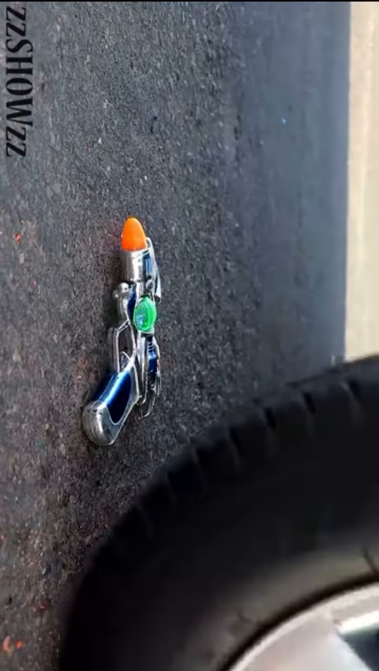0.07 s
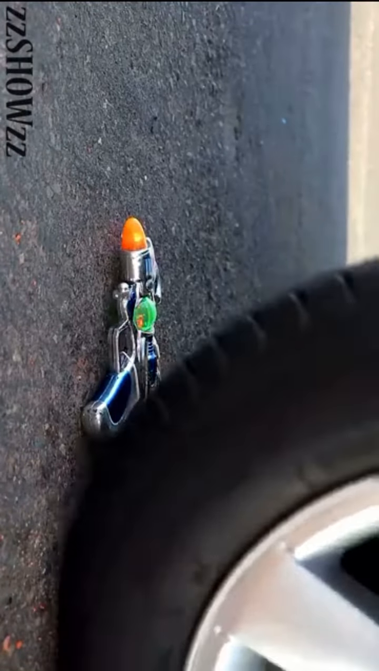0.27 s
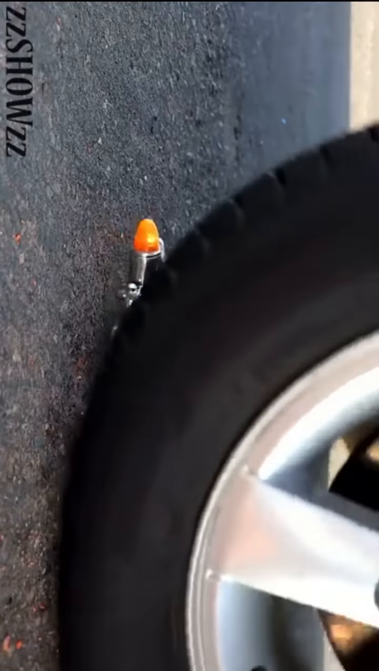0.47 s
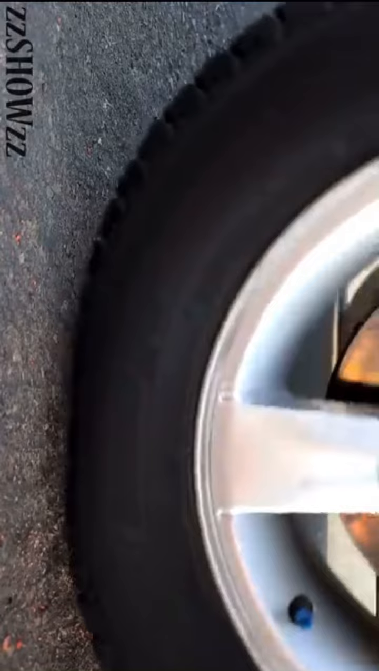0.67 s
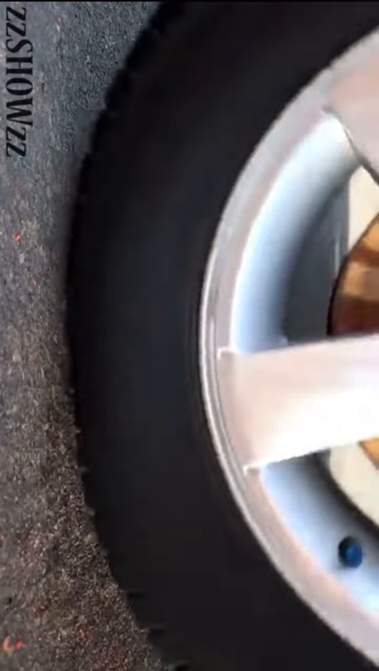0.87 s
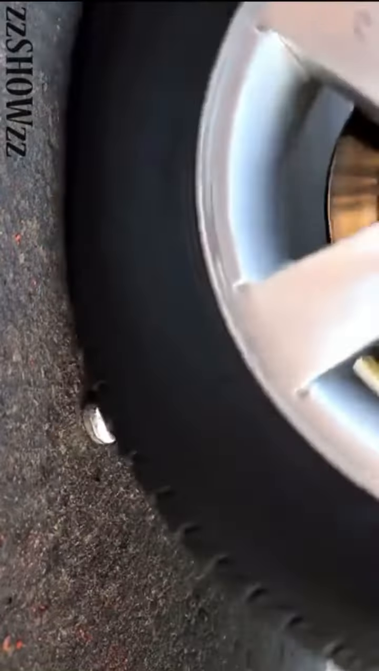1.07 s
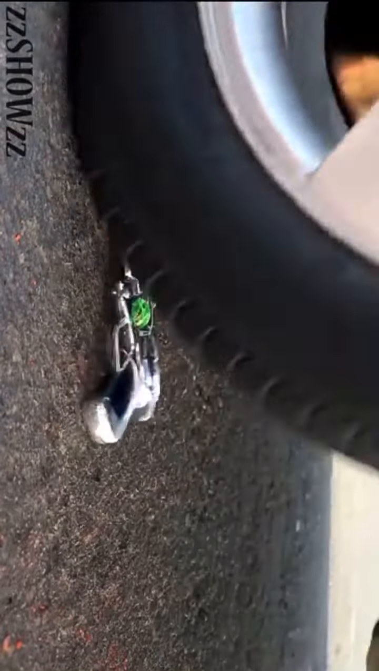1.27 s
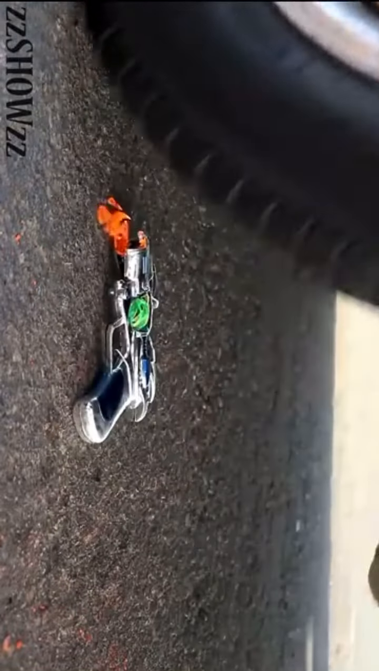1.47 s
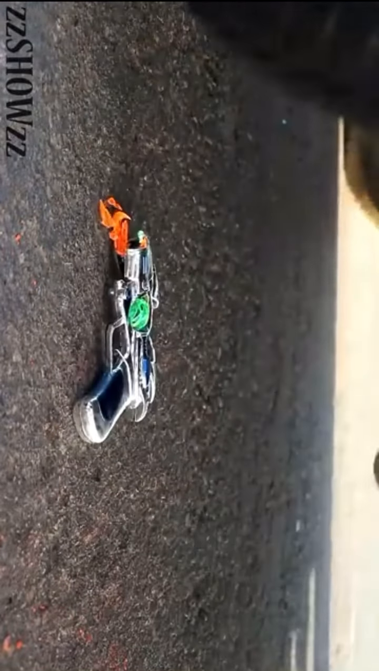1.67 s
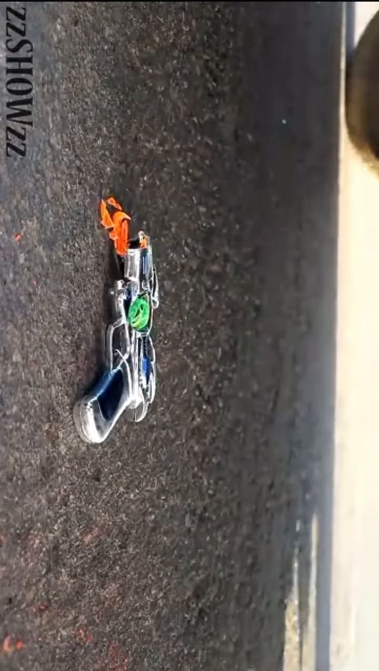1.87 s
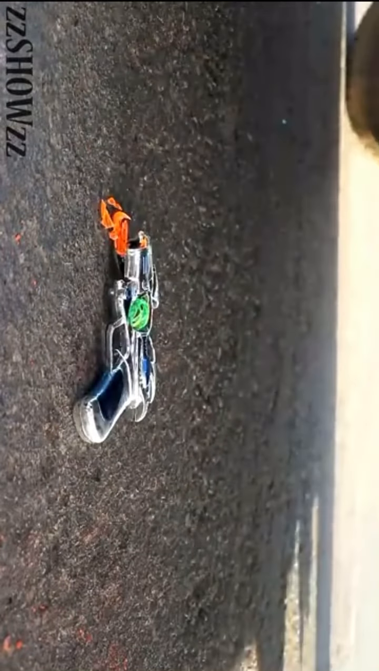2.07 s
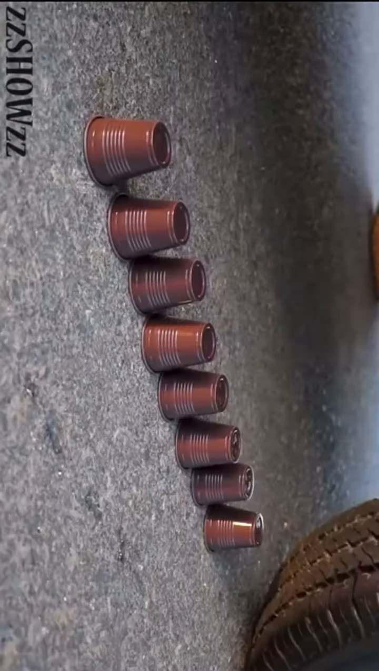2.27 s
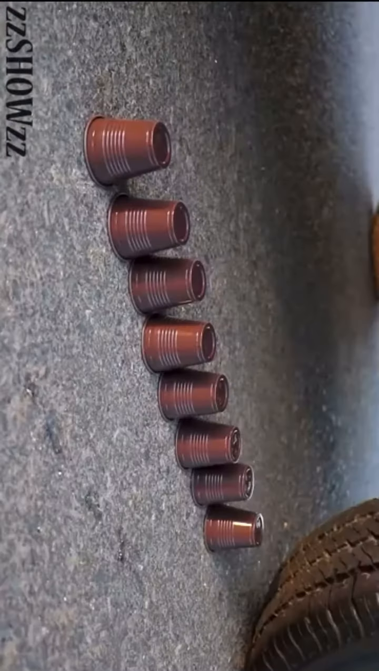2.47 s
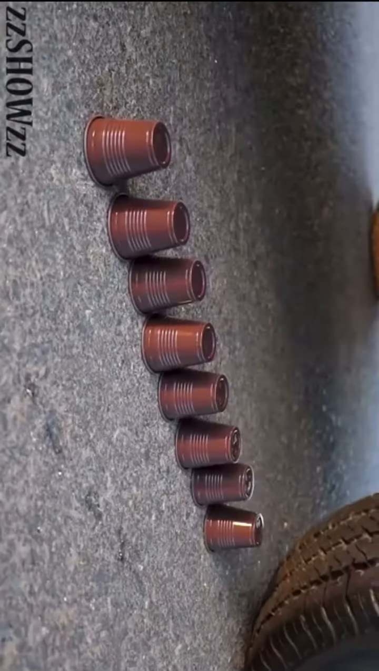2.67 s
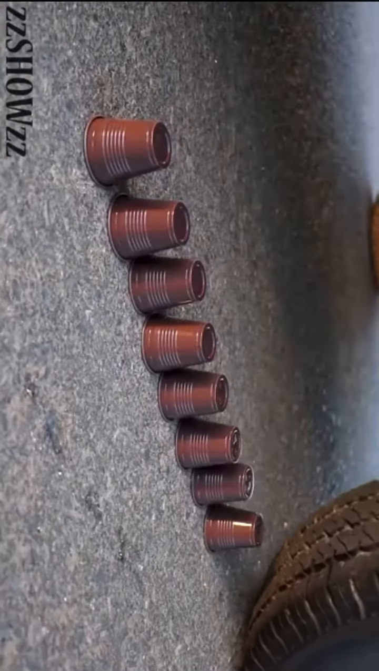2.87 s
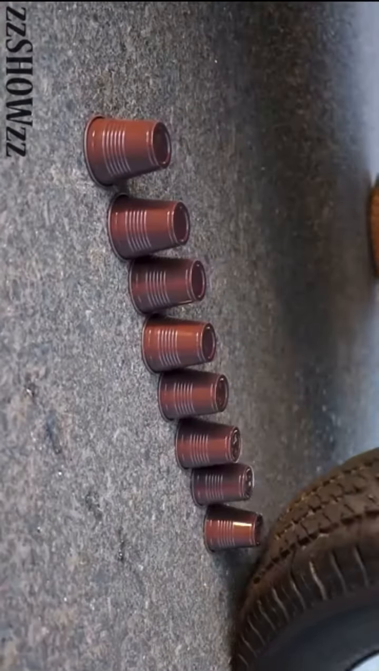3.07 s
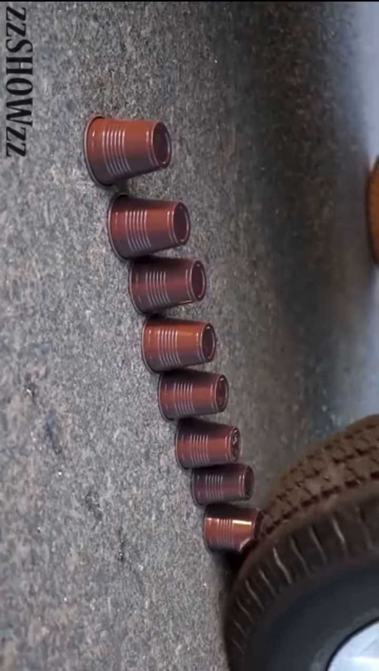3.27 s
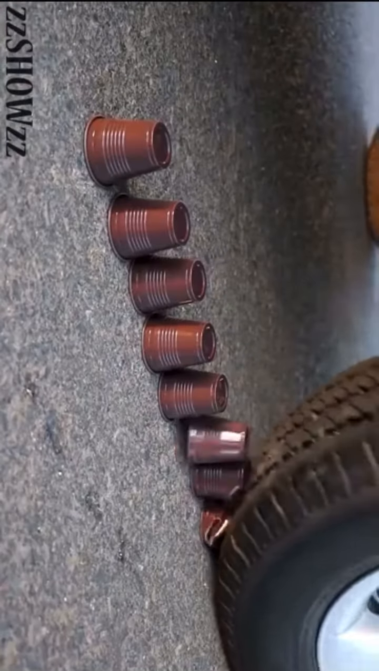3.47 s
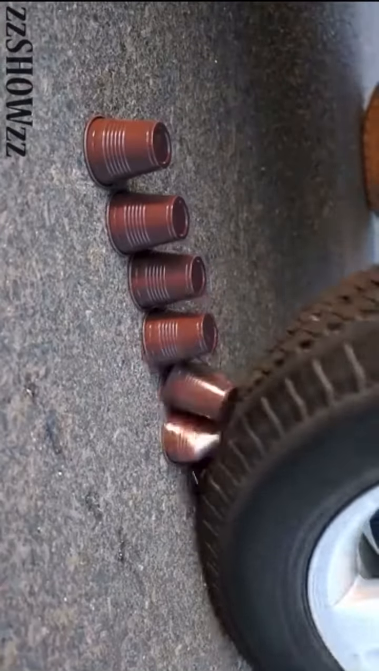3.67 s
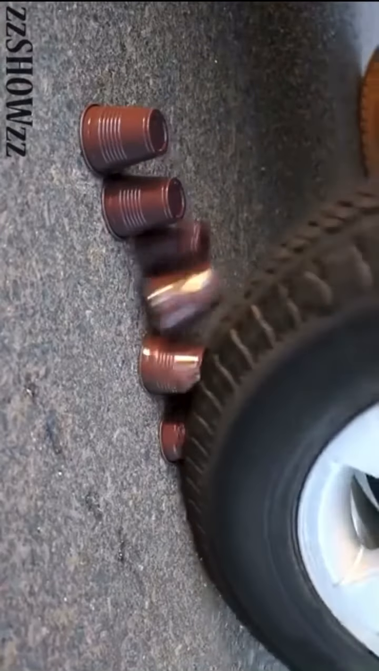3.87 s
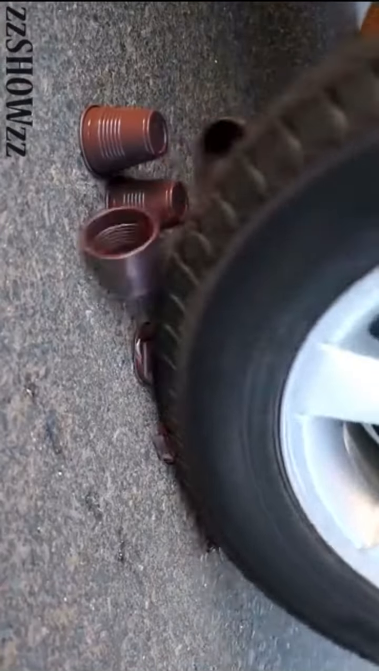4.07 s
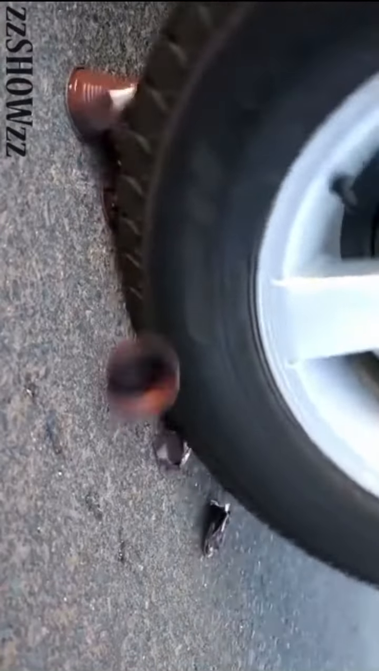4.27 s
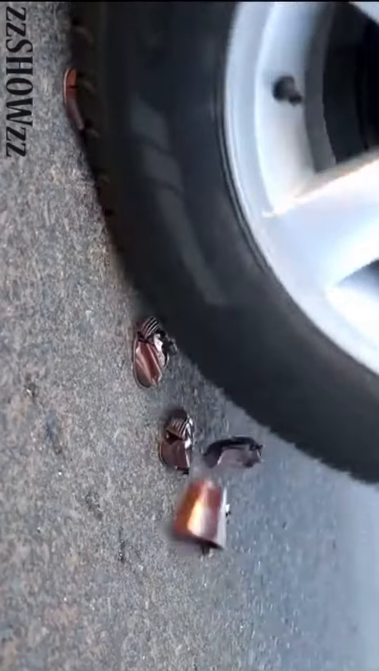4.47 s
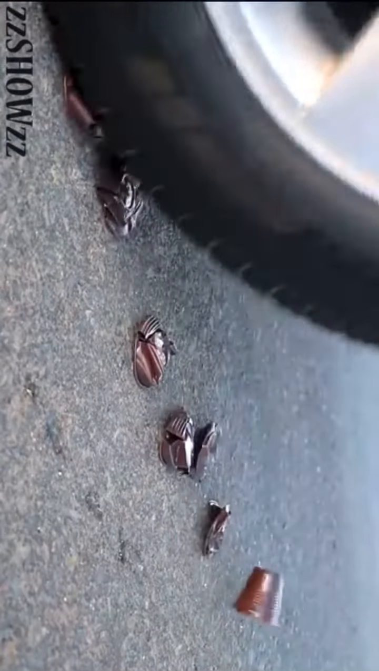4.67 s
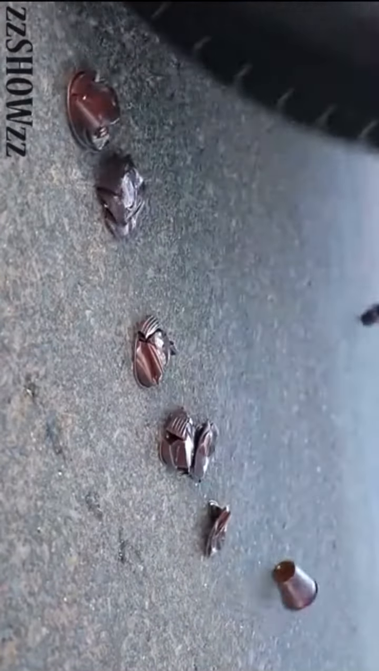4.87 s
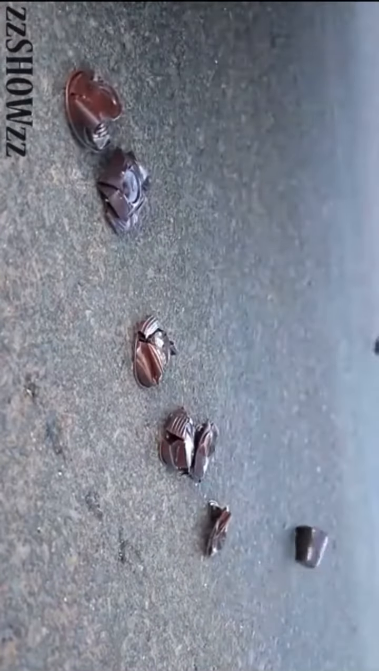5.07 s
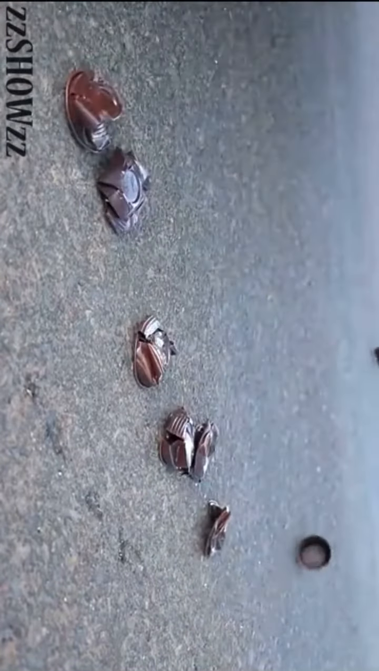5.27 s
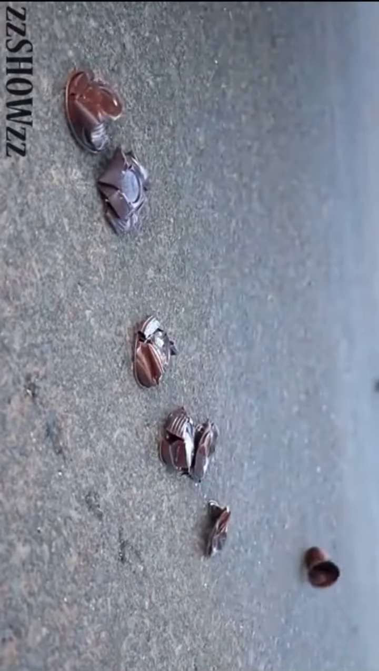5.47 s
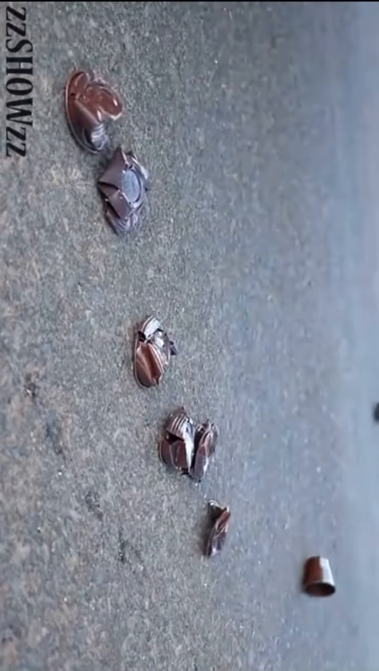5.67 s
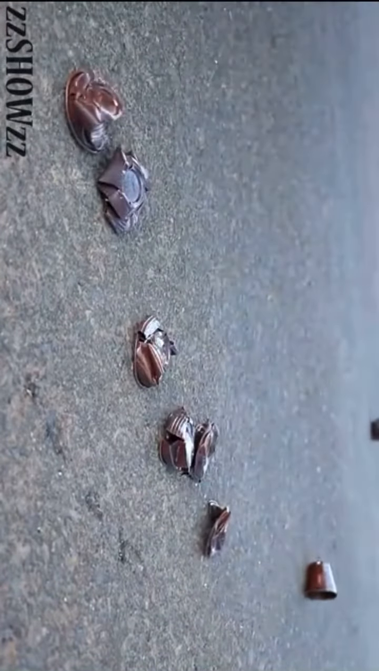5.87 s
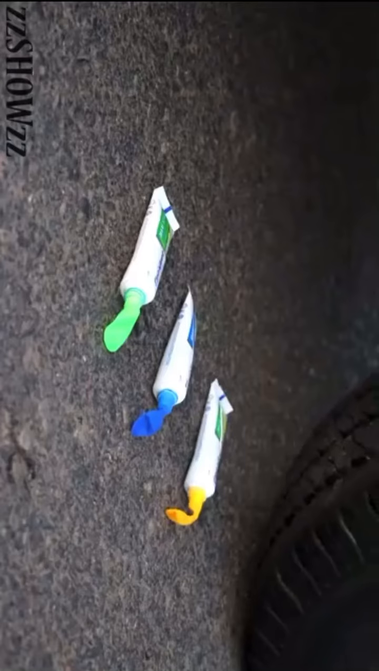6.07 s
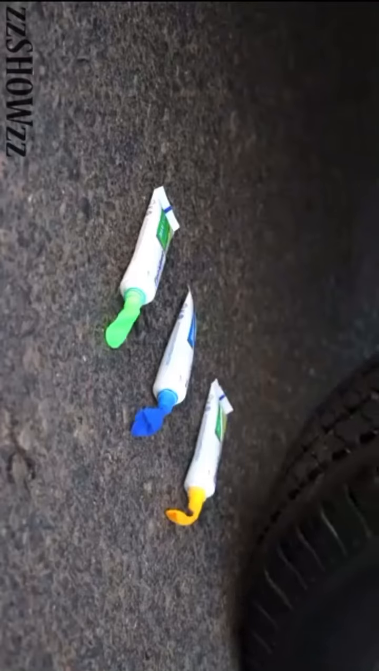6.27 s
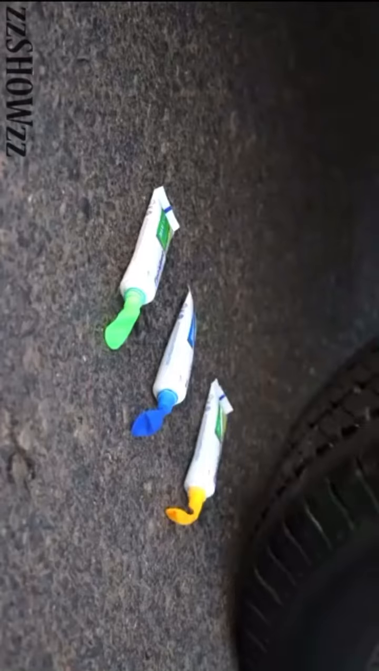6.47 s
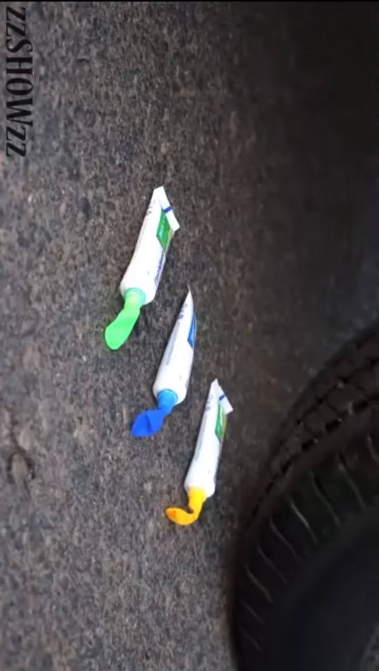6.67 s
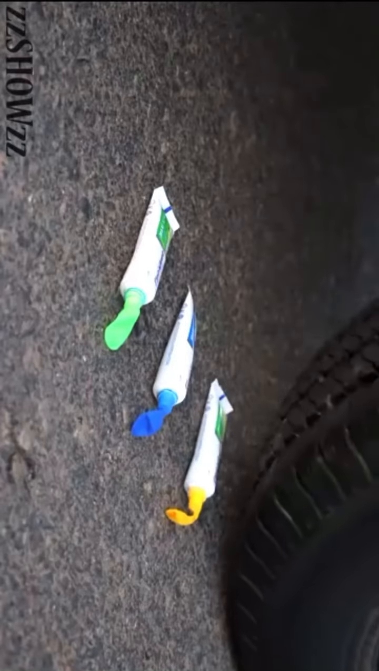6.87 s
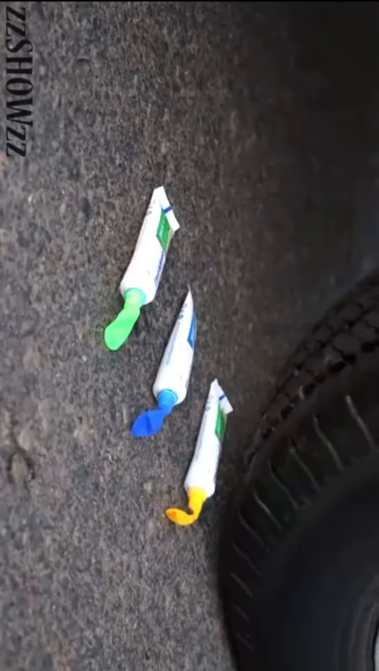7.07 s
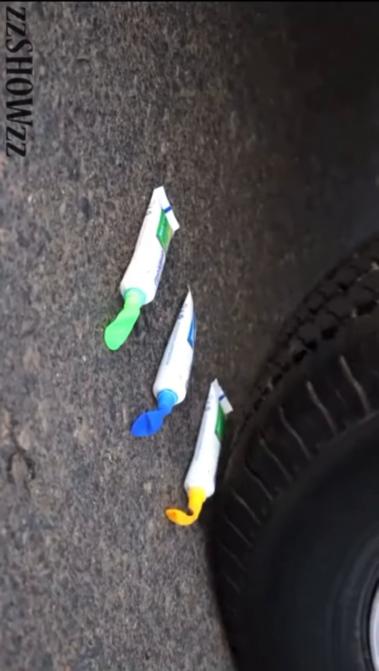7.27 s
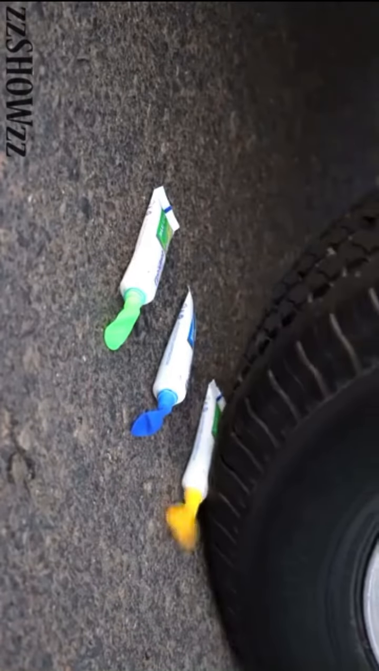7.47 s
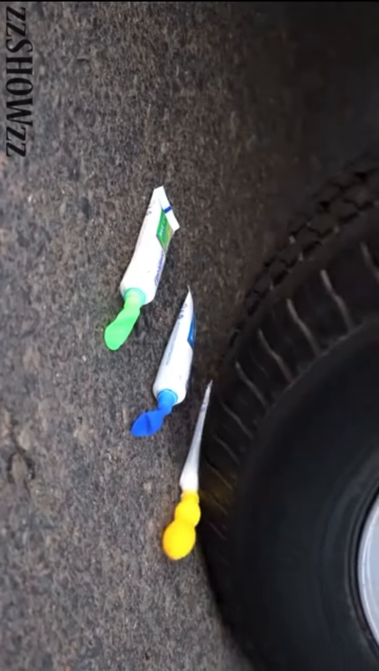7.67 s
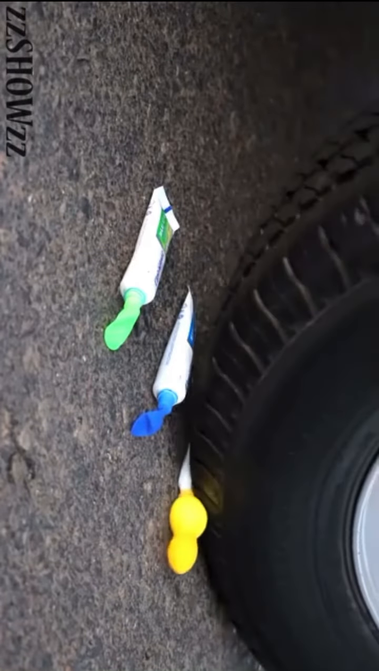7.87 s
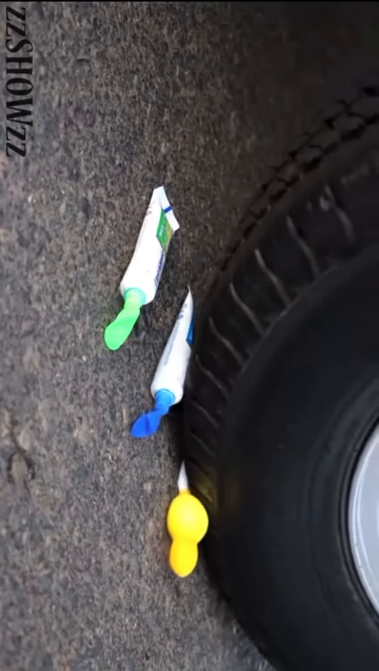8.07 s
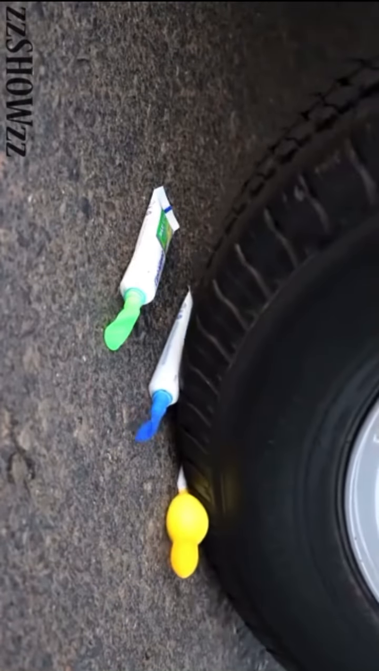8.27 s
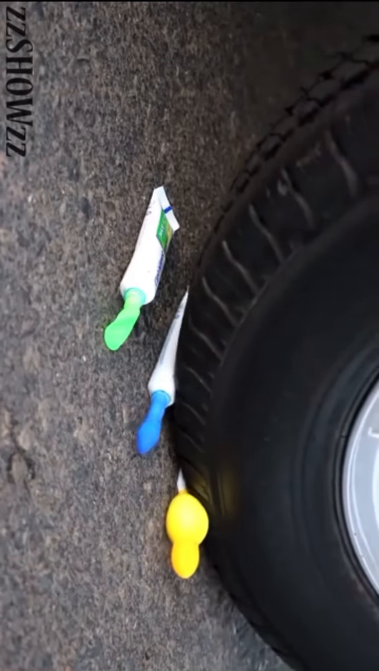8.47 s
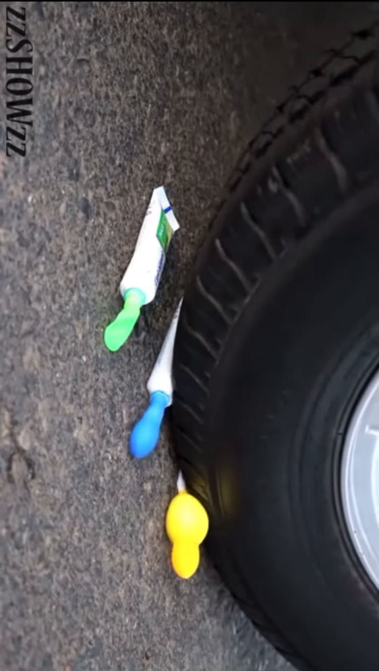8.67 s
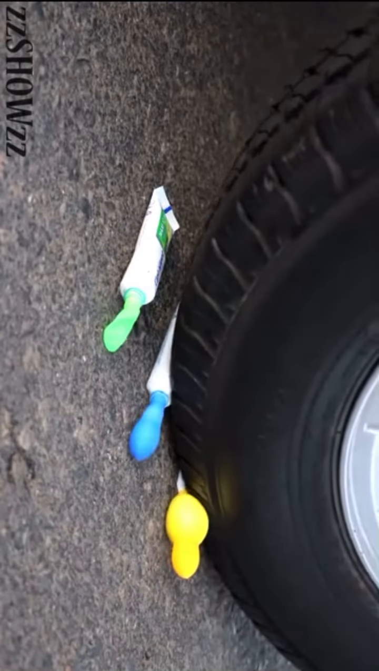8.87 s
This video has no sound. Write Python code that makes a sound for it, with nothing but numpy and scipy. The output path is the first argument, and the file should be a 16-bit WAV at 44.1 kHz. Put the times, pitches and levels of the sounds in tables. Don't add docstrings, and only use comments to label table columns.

```python
import sys
import numpy as np
from scipy import signal
from scipy.fft import rfft, irfft
from scipy.io import wavfile

SR = 44100
rng = np.random.default_rng(int(sys.argv[2]) if len(sys.argv) > 2 else 0)


def inscribe(sig):
    pcm = np.round(np.clip(np.atleast_2d(sig).T, -1, 1) * 32767)
    wavfile.write(sys.argv[1], SR, pcm.astype(np.int16))


def undo_db(level):
    steps = np.asarray(level, float) / 20
    return 10 ** steps


N = 392931

SCENE_CHANGES_S = [
    2.285,
    6.055,
]

# centre in seconds, peak level in dB, half length in seconds.
GUSTS = [
    (0, -66, .3),
    (1.93, -44.5, 0.097),
    (2.804, -54.5, 0.27),
    (3.993, -56.5, 0.46),
    (6.384, -46, 0.051),
    (6.702, -51, 0.062),
    (6.94, -59, .15),
]
BREEZE_DB = -77.5

# frequency in Hz, level in dB per Hz.
NEAR_SIDE = [(20, -9.5), (70, -13.5), (160, -14), (420, -12.5), (850, -16), (1300, -12.5), (1750, 1),
             (2300, -10), (3500, -18.5), (8600, -41), (11500, -44), (12300, -26.5), (14500, -34.5),
             (16000, -35)]
FAR_SIDE = [(20, -15.5), (127, -21), (300, -17), (600, -12), (1030, -11.5), (1290, -12.5), (1650, -15.5),
            (2000, -22), (2530, -10.5), (3500, -20.5), (5200, -22), (8000, -34), (16000, -52.5)]
CUP_YARD = [(20, 5.5), (77, 4), (310, -6), (620, -4.5), (1190, -8.5), (1660, -10), (1960, -10),
            (2750, -14.5), (5200, -22.5), (8000, -32.5), (16000, -54)]
TUBE_YARD = [(12, -44), (20, -21), (48, -0.5), (150, -5), (330, -2.5), (485, -7.5), (620, -2), (720, -10),
             (1480, -6.5), (1760, -13), (2260, -10.5), (2990, -17), (5230, -22.5), (8000, -33),
             (16000, -54)]
# time in seconds, engine level in dB, noise around the wheel note in dB,
# share of the far-side colour from 0 to 1.
ENGINE_MOVES = [(0, -33.5, -56, 0.1), (.3, -36, -36, 0.06), (.5, -34.5, -27, 0.44), (.9, -35, -51, 1),
                (1.0, -24, -13, 0.5), (1.1, -37.5, -34, 1), (1.5, -35, -21.5, 0.6), (2.09, -31.5, -33, 0.8),
                (2.29, -35, -49, 0.66)]
# time in seconds, level in dB.
YARD_LEVELS = [
    [(2.285, -45.5), (3.3, -46.5), (4.6, -48), (5.6, -50.5), (6.055, -52.5)],
    [(6.055, -45), (7.5, -46), (8.91, -46.5)],
]
# frequency in Hz, level in dB rms.
FAN = [(242.2, -51.5), (366.1, -50)]
# frequency in Hz, width in Hz, level in dB.
IDLE = [(334, 20, -65), (409, 20, -68), (603, 12, -58), (996, 25, -69), (1163, 25, -69), (1530, 30, -63),
        (2230, 25, -62), (3128, 60, -74), (3500, 80, -71), (5250, 300, -70)]
# frequency in Hz, level in dB rms.
IDLE_ORDERS = [(75, -55), (115, -58)]
# time in seconds, frequency in Hz, level in dB rms.
DRONE = [(6.06, 135, -60), (6.6, 145, -61), (6.95, 140, -56), (7.28, 152, -52), (7.55, 172, -56),
         (7.74, 168, -55), (7.9, 146, -52), (8.56, 158, -53), (8.91, 154, -53)]
DRONE_GAIN_DB = 0.5
# start in seconds, then rows of frequency in Hz, width in Hz, level in dB.
WHINE = (7.9, [(5300, 45, -69)])
# time in seconds, frequency in Hz, level in dB rms.
WHEEL_NOTE = [
    [(0.2, 602.8, -58), (0.316, 604.5, -43), (0.374, 603.9, -60), (0.47, 600.6, -30), (0.48, 601.1, -43),
     (0.49, 600.7, -31.5), (0.606, 597.9, -39), (0.614, 597.6, -48), (0.68, 597.6, -30.5)],
    [(1.09, 612.2, -34), (1.132, 601.1, -27.5), (1.196, 593.0, -45.5), (1.278, 599.6, -26),
     (1.412, 604.3, -42), (1.418, 601.4, -39), (2.106, 604.2, -45.5), (2.19, 587.5, -39),
     (2.285, 608.0, -49)],
]
WHEEL_HZ, WHEEL_WIDTH_HZ = 600, 30

# frequency in Hz, level in dB rms.
SQUEAK = [(3289, -38.5), (4893, -50)]
# frequency in Hz, width in Hz, level in dB.
PAD_HISS = [(13200, 1400, -56)]
SQUEAK_S = 2.112
# frequency in Hz, level in dB, 60 dB decay in seconds.
THUMP = (55, -8, .085)
THUMP_S = 0.719

# frequency in Hz, level in dB, 60 dB decay in seconds.
CUP_AIR = [(1267, -6, 0.082), (1287, -22, 0.03), (1120, -46, .04)]
# frequency in Hz, level in dB, 60 dB decay in seconds.
CUP_NOTES = [(1695, 0, .06), (1810, -4, .06), (2030, -5, .045), (2680, -18, .03), (3300, -11, .045),
             (3520, -5, .07), (3810, -11, .04), (4400, -6, .05), (4700, -1, .07), (4900, 0, .075),
             (5150, 0, .055), (5400, -3, .04), (6000, -3, .035), (6900, -7, .03), (7700, -7, .03),
             (8740, -9, .025)]
# start in seconds, air note peak in dB, low wall notes in dB, high wall notes in dB,
# strongest high note in Hz.
BOUNCES = [(4.1315, 5.5, -18, -7, 3270), (4.1954, -12, -23, -25, 5000), (4.3054, -12, -17, -11.5, 3120),
           (4.552, -33, -29, -11, 4040), (4.571, -17, -29, -15, 5160), (4.596, -1, -8.5, -16.5, 3760),
           (4.6363, -18, -28, -10, 5140), (4.7544, -8.5, -21, -18.5, 5250), (4.7905, -31, -29, -18.5, 5790),
           (4.806, -27, -31, -11.5, 4680), (4.824, -16, -12.5, -11.5, 5060),
           (4.8345, -24.5, -27, -28, 5220), (4.8582, -12.5, -21, -25, 5130), (4.8894, -38, -40, -28, 5100),
           (4.903, -27, -34, -24, 3700), (4.9217, -24, -21, -15.5, 4600), (4.9538, -23.5, -21, -16.5, 5150),
           (4.9688, -19.5, -36, -47, 3290), (4.9918, -31, -35, -16, 3030), (5.0105, -15.5, -24, -22, 5200),
           (5.0727, -10.5, -38, -21.5, 5060), (5.0802, -40, -12, -21.5, 3800),
           (5.1253, -26.5, -29, -29, 5000)]
# start in seconds, air note peak in dB, low wall notes in dB,
# high wall notes in dB, strongest high note in Hz.
ROLL = [(5.1866, -36, -38, -28.5, 5090), (5.2098, -20, -28, -36, 3550), (5.2334, -31, -39, -26, 4770),
        (5.2776, -27, -28, -30.5, 4740), (5.3005, -23.5, -41, -34, 4900), (5.3151, -13.5, -44, -27, 4860),
        (5.3606, -31, -50, -33.5, 4190), (5.3738, -21, -47, -28, 4700), (5.3963, -12, -43, -33.5, 4770),
        (5.4283, -37, -54, -36, 4750), (5.444, -21.5, -51, -31.5, 3460), (5.468, -31, -44, -48, 6000),
        (5.4935, -10.5, -34, -46, 4690), (5.5188, -25, -46, -34.5, 4350), (5.5518, -26, -46, -36, 4390),
        (5.572, -26, -54, -36, 4500), (5.6318, -22.5, -44, -30, 5000), (5.673, -27.5, -49, -28.5, 4380),
        (5.7039, -27, -52, -36, 3840), (5.7242, -32, -44, -55, 3840), (5.7437, -33, -50, -36.5, 4930),
        (5.772, -37, -55, -37.5, 4760), (5.818, -42, -55, -40.5, 4630), (5.8517, -49, -56, -44, 4740),
        (5.865, -44, -58, -43, 4750), (5.897, -39, -55, -34.5, 4630), (5.9284, -44, -55, -48, 4770),
        (5.9504, -42, -52, -46, 4850), (5.9833, -40.5, -47, -36.5, 4450), (6.0352, -46, -45, -52, 3130)]
AIR_LOW_HIGH_GAINS_DB, GRIT_DB = (1.5, 0, 7.5), -13.5
MAIN_NOTE_DB, MAIN_NOTE_T60_S = -1.0, 0.05
# start in seconds, peak in dB, sizzle in dB, 60 dB decay in seconds.
SCUFFS = [(4.552, -24, -2, .05), (4.57, -9, 6.5, .05), (4.6263, -12, 6, 0.055), (4.789, -23, -2, .05),
          (4.8059, -12, 4, 0.047), (4.921, -28, -8, 0.046), (4.955, -16, -9, .05), (4.9933, -17, -3, .07),
          (5.07, -24, 4.5, .1), (5.1248, -34, -5, .04), (5.243, -29, -8, .06), (5.3624, -38, 2, .05),
          (5.4448, -43, -6, .04), (5.656, -30, 5.5, 0.079)]
# start in seconds, length in seconds, crackle in dB,
# fade by the end in dB, hollow drumming in dB.
DRAGS = [
    (4.7, 0.463, -41.5, 20, -11),
    (5.19, 0.78, -61, 6.3, -23),
]

# frequency in Hz, level in dB.
SHELL = [(30, -22.5), (100, -15), (310, -13), (450, -14), (620, -3.5), (900, -2), (1200, -8.5),
         (3600, -7.5), (5200, -5), (8000, -5), (16000, -30.5)]
# frequency in Hz, level in dB.
CUP_WALL = [(60, -36.5), (200, -30), (490, -16), (700, -5), (1040, 4), (1470, -4.5), (2200, -5.5),
            (3200, -10.5), (5200, -10), (8100, -18), (13600, -26), (16000, -19.5)]
# time in seconds, hollow note in Hz, bright note in Hz.
TOY_BODY = [(0.46, 690, 2870), (0.614, 780, 1960), (0.666, 692, 3540), (0.924, 665, 3490),
            (1.042, 710, 2200), (1.07, 763, 4820), (1.158, 625, 3480), (1.404, 613, 3050),
            (1.46, 583, 2130)]
# time in seconds, hollow note in Hz, bright note in Hz.
CUP_BODY = [(3.33, 840, 1830), (3.36, 1009, 1685), (3.506, 1136, 2060), (3.878, 1038, 2004),
            (4.11, 1245, 2060), (4.32, 1033, 2330), (4.366, 994, 1793), (4.492, 1238, 2350),
            (4.6, 1230, 1860)]
HOLLOW_DB, HOLLOW_T60_S, BRIGHT_DB, BRIGHT_T60_S = -5.0, 0.04, -14.0, 0.012
# start in seconds, peak in dB, boom below 1.3 kHz in dB, 60 dB decay in seconds.
CRACKS = [(0.4720, -5.5, -40, 0.019), (0.4780, 8.5, -15, 0.031), (0.5442, -4.5, -18, 0.025),
          (0.5705, 4.5, -16, 0.038), (0.5922, -16, -3, 0.077), (0.6866, -6.5, -7.5, 0.06),
          (0.7181, 12, -3, 0.025), (0.7366, 7, -24, 0.035), (0.7594, 8, -10, 0.08), (0.8083, 7, -5, 0.047),
          (0.843, 1, -6, 0.035), (0.8589, 6, -12, 0.18), (0.8848, 3.5, 6, 0.039),
          (0.9044, 3.5, -5.5, 0.015), (0.9629, 9.5, -1.5, 0.048), (0.9799, -15.5, -7, 0.25),
          (1.0141, 2.5, 2, 0.045), (1.077, -2, -4.5, 0.031), (1.181, -16.5, -9, 0.043),
          (1.2516, -11, -11, 0.051), (1.274, -16.5, -14, 0.11), (1.296, -21, -24, 0.061),
          (1.3696, -21.5, -30, 0.13), (1.4445, -30, -2.5, 0.0087)]
# start in seconds, peak in dB, boom in dB,
# 60 dB decay in seconds.
KNOCKS = [
    (2.0756, -19, -29, 0.13),
    (2.0916, -21, -25, 0.043),
]
# start in seconds, peak in dB, sizzle in dB.
SNAPS = [(0.711, -17, 3), (0.694, -7, -21), (0.9415, -2, -32), (0.954, -5, -36), (1.138, -28, -26),
         (1.2091, -12.5, -21), (1.272, -3, -36), (1.2831, -7, -25), (1.292, -3.5, -30), (1.3186, -15, -16),
         (1.3493, -15, -7), (1.3683, -10.5, -17), (1.38, -18, -21), (1.389, -10.5, -40), (1.4338, -14, -12),
         (1.444, -1, -11), (1.5188, -26, -24), (1.8464, -26, -25), (4.6264, -30, -9), (4.674, -29, -25),
         (4.684, -11, -37), (4.6953, -19.5, -42), (8.886, -34, -40)]
SNAP_BOOM_DB, SNAP_T60_S = -10.5, 0.016
# start in seconds, peak in dB, boom in dB.
BUCKLES = [(3.3335, -14.5, -5), (3.3534, -8.5, -22), (3.3658, -19, 19), (3.4294, 0, -7.5),
           (3.449, -11.5, -29), (3.4772, -5.5, -5), (3.5208, -22.5, 4), (3.541, -2, -12), (3.576, -2, -2.5),
           (3.6186, -2, -6.5), (3.6551, -6, 2), (3.675, -10, 1.5), (3.7046, -13, -22), (3.739, -21, -23),
           (3.7487, -2, -32), (3.7867, -0.5, -11.5), (3.8328, 1, -16.5), (3.8655, -1, 4), (3.92, -1, 1),
           (3.9807, -2, -6.5), (4.0186, -2.5, -4), (4.0545, -12.5, -4), (4.0952, 1, -6),
           (4.144, -14.5, -14), (4.1952, -5, -5.5), (4.24, -27, -16), (4.3007, -12, 10), (4.338, 1, -8.5),
           (4.354, -6, -10.5), (4.3998, -2.5, -1.5), (4.4635, -23, 14), (4.4868, -7.5, -8),
           (4.5072, -25, 0), (4.5514, -19.5, 7.5), (4.5918, -16, -36)]
BUCKLE_T60_S = 0.11
# dB for a full-scale break with no boom, dB lost per dB of strength, dB lost per dB of boom.
SHELL_SIZZLE, WALL_SIZZLE, KNOCK_SIZZLE = (-10, 0.23, 0.23), (-14.5, 0.15, 0.47), (-10.5, 0, 0)
# start in seconds, length in seconds, crackle in dB,
# fade by the end in dB, hollow drumming in dB.
TOY_CRUSH = [
    (.843, 0.0943, -12.5, 11, -11),
]
# start in seconds, length in seconds, crackle in dB,
# fade by the end in dB, hollow drumming in dB.
CUP_CRUSH = [(3.328, 0.024, -30.5, 6.1, 23.5), (3.353, 0.051, -7, 5.5, -3), (3.428, 0.1, -15, 21, 1.5),
             (3.541, 0.072, -19, 0.5, 9), (3.575, 0.066, -6, 25, -1.5), (3.655, 0.074, -11, 37, -12),
             (3.705, 0.033, -15, 7.8, 7), (3.75, 0.095, -8.5, 10, -1), (3.833, .025, -13.5, 5.7, 2),
             (3.862, 0.034, -8.5, 1.3, 5.5), (3.908, 0.076, -9.5, 2, 0), (3.97, 0.077, -10.5, 2.1, -3),
             (4.045, 0.022, -13.5, 4.9, -5), (4.095, 0.014, -2, 5.5, -9.5), (4.143, 0.044, -11, 9.9, -0.5),
             (4.192, 0.018, 0.5, 3, 4), (4.24, 0.07, -9.5, 5.1, -0.5), (4.322, 0.058, -7, 4, 2),
             (4.395, 0.15, -11, 15.5, -7.5), (4.55, 0.21, -33.5, 10, -5)]
# start in seconds, length in seconds, crackle in dB,
# fade by the end in dB, hollow drumming in dB.
DEBRIS = [
    (1.09, .41, -38.5, 3.3, -19),
]
PUSH_ATTACK_S, PUSH_RISE_DB, PUSH_RELEASE_S, PUSH_TAIL_T60_S = 0.016, 4, 0.055, 0.1

CEILINGS = [.82, .59, .9]
# frequency in Hz, width in Hz, depth from 0 to 1.
PORT_NOTCH = (7950, 450, .6)


def rms_one(x):
    return x / np.sqrt(np.mean(x ** 2) + 1e-20)


def peak_one(x):
    return x / np.abs(x).max()


def in_time(rows):
    s, *columns = np.transpose(rows)
    return [np.interp(np.arange(N) / SR, s, c) for c in columns]


def between(start_s, end_s):
    t = np.arange(N) / SR
    return np.clip((t - start_s) / 0.003, 0, 1) * np.clip((end_s - t) / 0.003, 0, 1)


def coloured(x, spectrum, size=4096):
    hz, level_db = np.transpose(spectrum)
    grid = np.log(np.maximum(np.arange(size // 2 + 1) * SR / size, 1))
    cepstrum = irfft(np.log(undo_db(np.interp(grid, np.log(hz), level_db))))
    cepstrum[1:size // 2] *= 2
    cepstrum[size // 2 + 1:] = 0
    response = irfft(np.exp(rfft(cepstrum)))
    return signal.oaconvolve(x, response)[:len(x)]


def band(x, low_hz, high_hz):
    edges = [low_hz, min(high_hz, 0.45 * SR)]
    return signal.sosfilt(signal.butter(2, edges, "band", fs=SR, output="sos"), x)


def high_pass(x, order, hz):
    return signal.sosfilt(signal.butter(order, hz, "high", fs=SR, output="sos"), x)


def notch(x, hz, width_hz, depth):
    r = np.exp(-np.pi * width_hz / SR)
    poles = [1, -2 * r * np.cos(2 * np.pi * hz / SR), r * r]
    resonance = signal.lfilter([(1 - r * r) / 2, 0, (r * r - 1) / 2], poles, x)
    return x - np.clip(depth, 0, 1) * resonance


def ring(clicks, hz, t60):
    r = undo_db(-60 / (t60 * SR))
    w = 2 * np.pi * hz / SR
    return signal.lfilter([0, np.sin(w)], [1, -2 * r * np.cos(w), r * r], clicks + 1e-18)


def tones(lines):
    t = np.arange(N) / SR
    return sum(np.sqrt(2) * undo_db(db) * np.sin(2 * np.pi * hz * t) for hz, db in lines)


def gliding_tone(hz, level_db):
    return np.sqrt(2) * undo_db(level_db) * np.sin(2 * np.pi * np.cumsum(hz) / SR)


def hums(lines):
    white = rng.standard_normal(N)
    out = np.zeros(N)
    for hz, width, db in lines:
        narrow = ring(white, hz, 3.2 / width)
        out += undo_db(db) * rms_one(ring(narrow, hz, 0.72 / width))
    return out


def grains(count, per_s, spread_db):
    sizes = undo_db(spread_db * np.minimum(rng.exponential(1, count), 4)) * rng.choice([-1, 1], count)
    return rms_one(sizes * (rng.random(count) < per_s / SR))


def wind():
    t = np.arange(0, N, 64) / SR
    gusts = sum(undo_db(db) * np.exp(-((t - s) / half) ** 2) for s, db, half in GUSTS)
    level = np.interp(np.arange(N) / SR, t, undo_db(BREEZE_DB) + gusts)
    return level * rms_one(band(rng.standard_normal(N), 2, 97))


def late_whine():
    start_s, lines = WHINE
    return hums(lines) * between(start_s, 9.5)


def later_engine():
    out = np.zeros(N)
    idle = (hums(IDLE) + tones(IDLE_ORDERS)) * undo_db(45)
    for curve, colour in zip(YARD_LEVELS, (CUP_YARD, TUBE_YARD)):
        street = rms_one(coloured(rng.standard_normal(N), colour))
        shot = between(curve[0][0], curve[-1][0] + 0.0022)
        out += undo_db(in_time(curve)[0]) * (street + idle) * shot
    hz, drone_db = in_time(DRONE)
    drone = gliding_tone(hz, drone_db + DRONE_GAIN_DB)
    return out + drone * between(SCENE_CHANGES_S[1], 9.5)


def first_engine():
    engine_db, wheel_db, far = in_time(ENGINE_MOVES)
    far = np.clip(far, 0, 1)
    near_hiss = rms_one(coloured(rng.standard_normal(N), NEAR_SIDE))
    far_hiss = rms_one(coloured(rng.standard_normal(N), FAR_SIDE))
    engine = undo_db(engine_db - 1.0) * (np.sqrt(1 - far) * near_hiss + np.sqrt(far) * far_hiss)
    note_hz, note_db = in_time(WHEEL_NOTE[0] + WHEEL_NOTE[1])
    note = gliding_tone(note_hz, note_db) * between(WHEEL_NOTE[0][0][0], 9.5)
    wheel = note + undo_db(wheel_db - 12.5) * hums([(WHEEL_HZ, WHEEL_WIDTH_HZ, 0)])
    return (engine + wheel + tones(FAN)) * between(-1, SCENE_CHANGES_S[0])


def brake():
    t = np.arange(N) / SR
    wobble = np.cumsum(band(rng.standard_normal(N), 10, 80)) * 0.0047
    squeak = sum(np.sqrt(2) * undo_db(db) * np.sin(2 * np.pi * hz * t + wobble) for hz, db in SQUEAK)
    return (squeak + hums(PAD_HISS)) * between(SQUEAK_S, SCENE_CHANGES_S[0])


def thump():
    hz, level_db, t60 = THUMP
    click = np.zeros(N)
    click[round(THUMP_S * SR)] = undo_db(level_db)
    return ring(click, hz, t60)


def loose_cup():
    touches = BOUNCES + ROLL
    hz, mode_db, t60 = np.array(CUP_AIR + CUP_NOTES).T[:, :, None]
    out = np.zeros(N + SR)
    t = np.arange(SR // 5) / SR
    luck = rng.standard_normal((len(touches), 2, len(hz), 1))
    scrapes = rng.standard_normal((len(touches), len(t)))
    flexes = hz > 1500
    for (s, *parts_db, main_hz), (loud, bend), noise in zip(touches, luck, scrapes):
        pitch = hz * (1 + np.where(flexes, 0.02, 0.006) * bend)
        notes = undo_db(mode_db + 3 * loud * flexes - 60 * t / t60) * np.sin(2 * np.pi * pitch * t)
        skid = 0.1 * noise[:800] * undo_db(-60 * t[:800] / 0.03)
        skid[:9] += np.hanning(9) / 2.8
        main = undo_db(MAIN_NOTE_DB - 60 * t / MAIN_NOTE_T60_S) * np.sin(2 * np.pi * main_hz * t)
        groups = [notes[:3].sum(axis=0), notes[3:6].sum(axis=0), notes[6:].sum(axis=0) + main]
        air, low, high = (peak_one(signal.oaconvolve(g, skid)[:len(t)]) for g in groups)
        grit = band(band(noise, 3200, 8000), 3200, 9000)
        high = band(high, 2400, 11000) + undo_db(GRIT_DB - 60 * t / 0.07) * grit
        parts = [band(air, 950, 1500), band(low, 1500, 2300), high]
        out[round(s * SR):][:len(t)] += undo_db(np.add(parts_db, AIR_LOW_HIGH_GAINS_DB)) @ parts
    return high_pass(out[:N], 4, 930)


def breaking(events, sizzle):
    base_db, per_peak, per_boom = sizzle
    return [(s, peak_db, boom_db, base_db - per_peak * peak_db - per_boom * boom_db, t60)
            for s, peak_db, boom_db, t60 in events]


def fractures(events, spectrum, shard_hz, per_s, shard_db, shard_cycles, gain_db, body=None):
    out, size = np.zeros(N + SR), SR // 6
    t = np.arange(size) / SR
    shower = grains(N + SR, per_s, spread_db=3.5)
    pitches = shard_hz[0] * (shard_hz[1] / shard_hz[0]) ** rng.random((len(events), 14))
    body_notes = [(HOLLOW_DB, HOLLOW_T60_S), (BRIGHT_DB, BRIGHT_T60_S)] if body else []
    for (s, peak_db, boom_db, sizzle_db, t60), shards in zip(events, pitches):
        at = round(s * SR)
        burst = shower[at:at + size] * undo_db(-60 * t / np.clip(t60, 0.008, 0.25))
        burst[0] += 2.5
        notes = sum(ring(burst, hz, shard_cycles / hz) * np.sqrt(hz / SR) for hz in shards)
        sound = coloured(burst + undo_db(shard_db) * notes, spectrum, size=1024)
        parts = [band(sound, 120, 1300), band(sound, 1300, 7000), band(sound, 7000, 16500)]
        for k, (db, decay) in enumerate(body_notes):
            note_hz = np.interp(s, *np.transpose(body)[[0, k + 1]]) * rng.uniform(0.88, 1.1)
            parts[k] = peak_one(parts[k]) + undo_db(db) * peak_one(ring(burst, note_hz, decay))
        levels = undo_db(peak_db + gain_db + np.array([boom_db, 0, sizzle_db]))
        out[at:at + size] += sum(g * peak_one(p) for g, p in zip(levels, parts))
    return out[:N]


def crackle(pushes, spectrum, body, per_s, gain_db, clump_db):
    clumps = undo_db(clump_db * rms_one(band(rng.standard_normal(N), 7.44, 63)))
    creases = coloured(clumps * grains(N, per_s, spread_db=2.5), spectrum)
    crisp = rms_one(band(creases, 1500, 16500))
    hollow = band(creases, 120, 1500)
    out = np.zeros(N)
    bends = rng.uniform(0.7, 1.5, (len(pushes), 6))
    for (s, length, crisp_db, fade_db, hollow_db), bend in zip(pushes, bends):
        t = np.arange(round((length + 0.06) * SR)) / SR
        span = slice(round(s * SR), round(s * SR) + len(t))
        rise = np.clip(1 - t / PUSH_ATTACK_S, 0, 1)
        fall = np.clip(1 - (length - t) / min(PUSH_RELEASE_S, length), 0, 1)
        tail_db = 60 * np.maximum(t - length, 0) / PUSH_TAIL_T60_S
        body_hz = bend * np.interp(s + length / 2, *np.transpose(body)[:2])
        ringing = sum(ring(hollow[span], hz, 0.038) for hz in body_hz)
        drum = rms_one(hollow[span]) + 1.22 * rms_one(ringing)
        level = undo_db(crisp_db - PUSH_RISE_DB * rise - fade_db * fall + gain_db - tail_db)
        out[span] += level * (crisp[span] + undo_db(hollow_db - 6.0) * drum)
    return out


def cup_scrapes():
    rows = [(s, db, -25, *rest) for s, db, *rest in SCUFFS]
    scuffs = fractures(rows, CUP_WALL, (2000, 8000), per_s=9000, shard_db=-22.0, shard_cycles=18, gain_db=0)
    return scuffs + crackle(DRAGS, CUP_WALL, CUP_BODY, 6000, gain_db=0, clump_db=3)


def crushed_cups():
    rows = breaking([(*row, BUCKLE_T60_S) for row in BUCKLES], WALL_SIZZLE)
    buckles = fractures(rows, CUP_WALL, (1300, 5500), per_s=9000, shard_db=-22.0, shard_cycles=18,
                        gain_db=3.0, body=CUP_BODY)
    return buckles + crackle(CUP_CRUSH, CUP_WALL, CUP_BODY, 5000, gain_db=1.0, clump_db=4.5)


def splinters():
    rows = [(s, peak_db, SNAP_BOOM_DB, sizzle_db, SNAP_T60_S) for s, peak_db, sizzle_db in SNAPS]
    return fractures(rows, SHELL, (1500, 8000), per_s=3000, shard_db=-15.0, shard_cycles=25, gain_db=1.0)


def crushed_toy():
    rows = breaking(CRACKS, SHELL_SIZZLE) + breaking(KNOCKS, KNOCK_SIZZLE)
    cracks = fractures(rows, SHELL, (1100, 7000), per_s=12000, shard_db=-23.0, shard_cycles=25,
                       gain_db=3.0, body=TOY_BODY)
    creases = crackle(TOY_CRUSH, SHELL, TOY_BODY, 7000, gain_db=-4.5, clump_db=-1.5)
    debris = crackle(DEBRIS, CUP_WALL, TOY_BODY, 700, gain_db=0, clump_db=4)
    return cracks + creases + debris


def under_car(x):
    t = np.arange(SR // 12) / SR
    echoes = rms_one(grains(len(t), 1500, spread_db=0.0) * undo_db(-60 * t / 0.13)) / np.sqrt(len(t))
    return x + undo_db(-9.5) * band(signal.oaconvolve(x, echoes)[:N], 200.3, 4100)


def scene():
    background = wind() + late_whine() + later_engine() + first_engine()
    crushed = under_car(crushed_toy() + splinters() + crushed_cups())
    plastic = crushed + loose_cup() + cup_scrapes()
    plastic = high_pass(plastic, 2, 150)
    return (background + brake() + thump() + plastic)[None]


def low_pass(x):
    return signal.sosfilt(signal.butter(12, 16650, fs=SR, output="sos"), x)


def record(dry):
    top = np.array(CEILINGS)[np.searchsorted(SCENE_CHANGES_S, np.arange(N) / SR)]
    dry = notch(dry, *PORT_NOTCH)
    squared = dry / (1 + np.abs(dry / top) ** 4) ** 0.25
    smooth = signal.sosfilt(signal.cheby2(10, 60, 16700, fs=SR, output="sos"), squared)
    mix = np.clip(smooth, -1, 1)
    return low_pass(mix)


dry = scene()
out = record(dry)
inscribe(out)
```